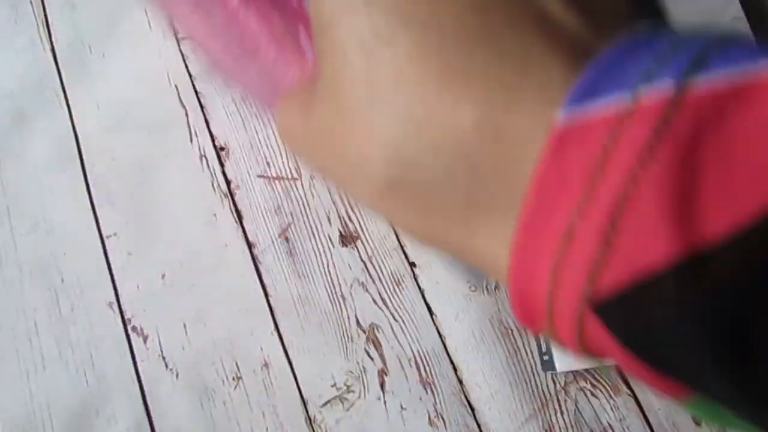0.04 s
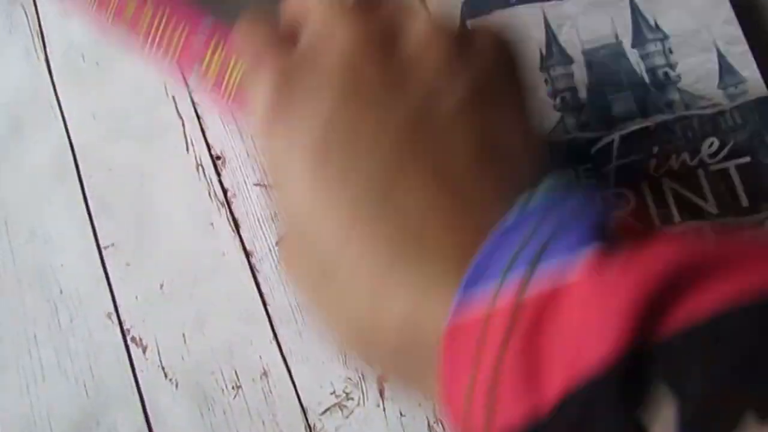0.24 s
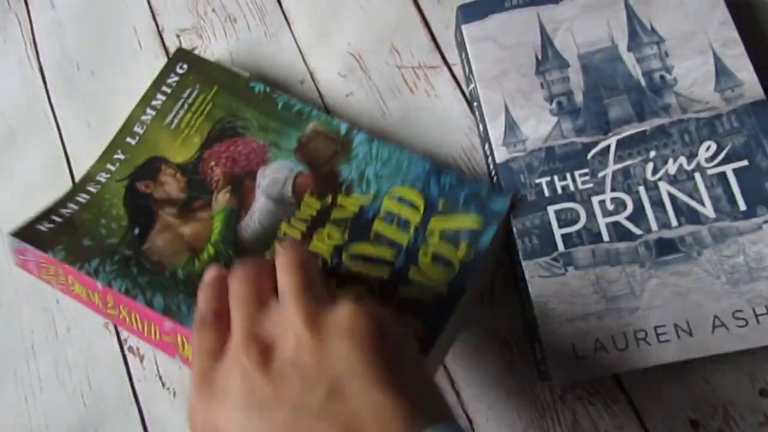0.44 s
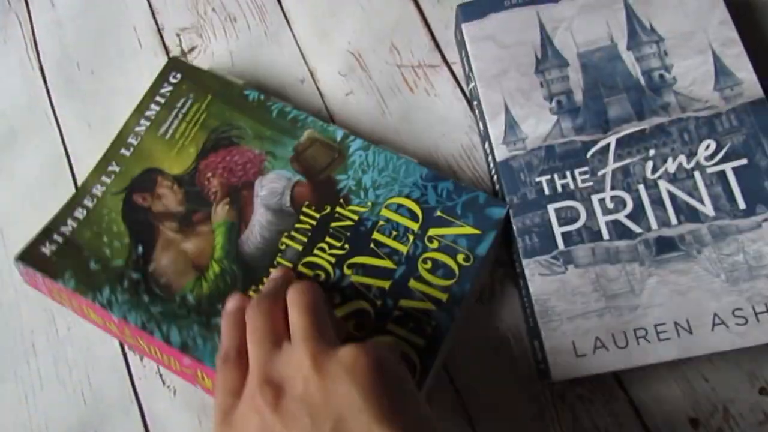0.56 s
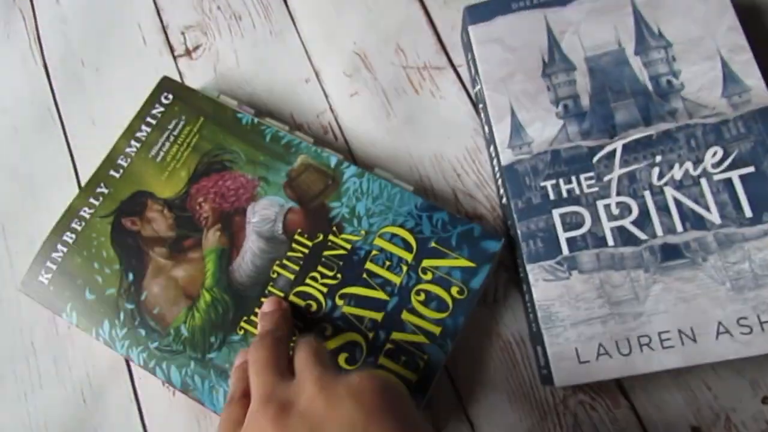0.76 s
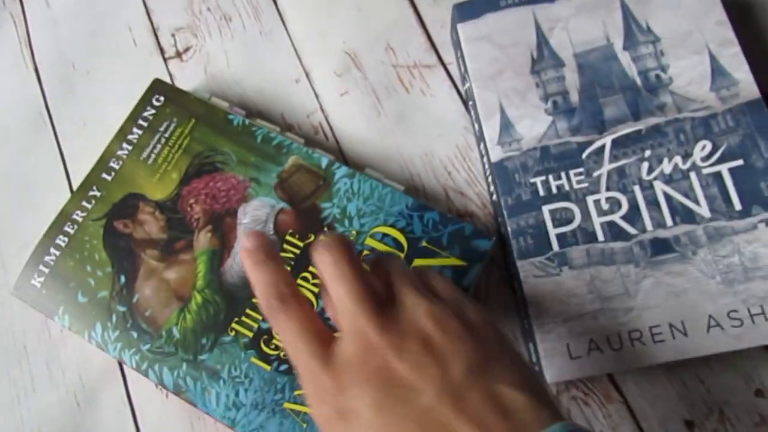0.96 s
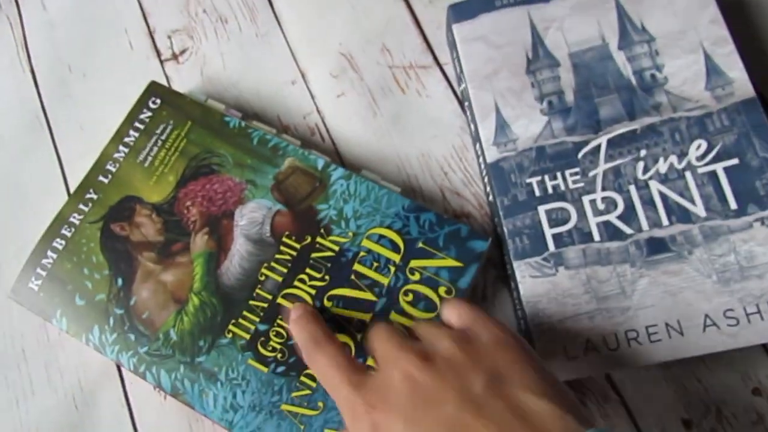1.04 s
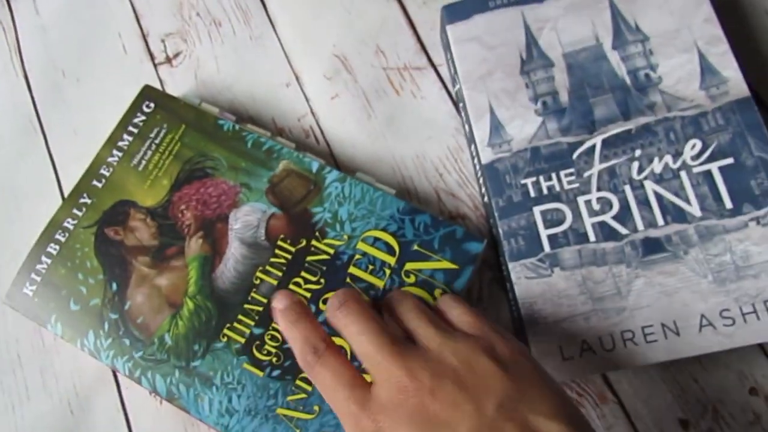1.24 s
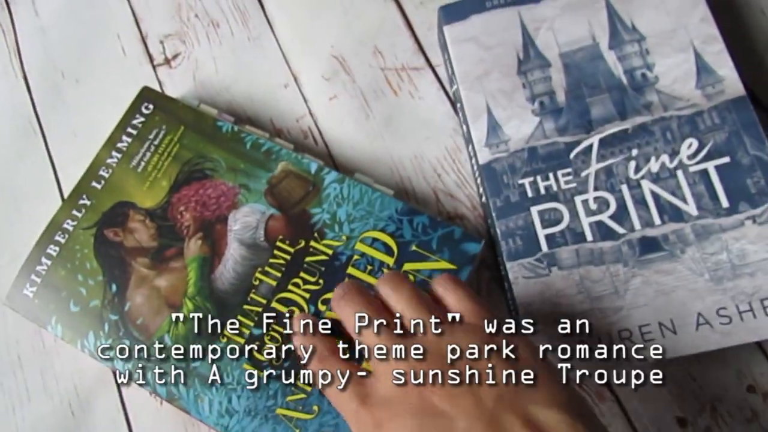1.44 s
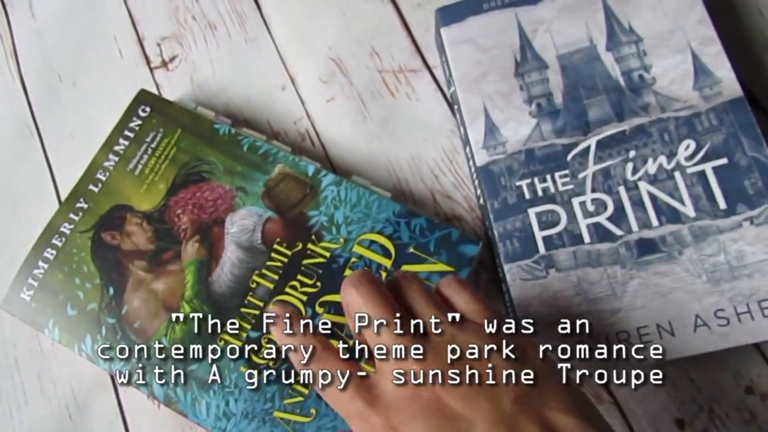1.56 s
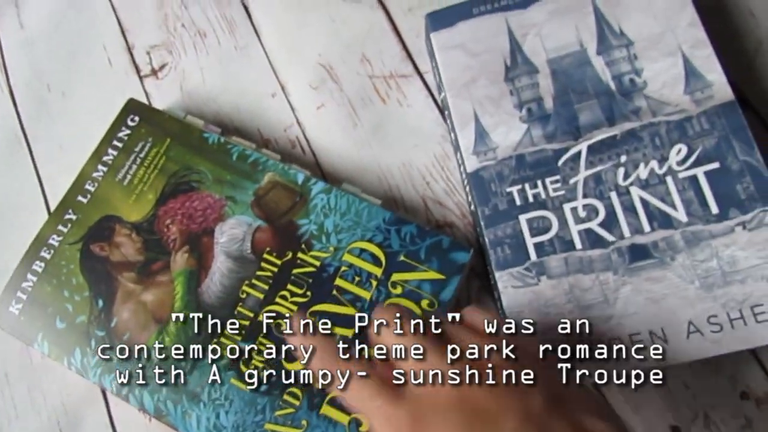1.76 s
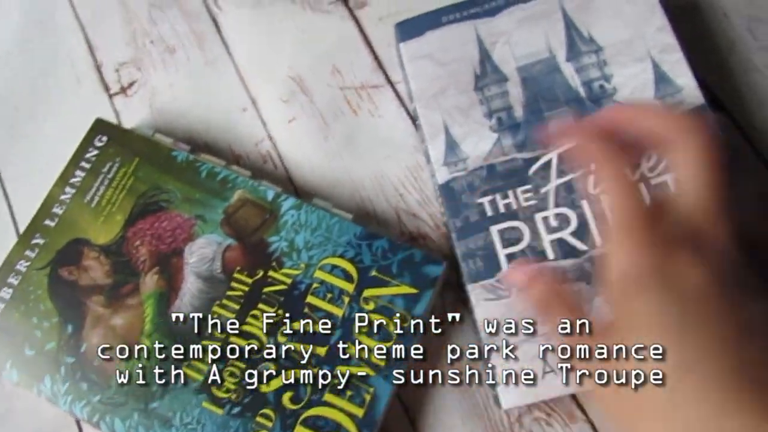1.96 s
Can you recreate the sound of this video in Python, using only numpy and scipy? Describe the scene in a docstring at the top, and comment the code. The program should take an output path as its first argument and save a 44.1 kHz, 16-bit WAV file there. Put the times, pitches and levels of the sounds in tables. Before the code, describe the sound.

A paperback is set down on wooden boards, close by in a small quiet room. Its cover drags and its spine thuds near 0.3 seconds, then the pages clap shut at 0.36 and it scuffs into place. From 0.7, fingers slide and squeak on the glossy cover, landing with one tick. Between 1.1 and 1.7 come four taps, nail ticks over dull knocks, with faint slides between and after.

```python
"""A paperback is set down on wooden boards in a small quiet room, close to the microphone.
Its spine thuds while the cover drags and the leaves brush; at 0.36 s the pages clap shut and the book
scuffs over the wood. From 0.67 s fingers slide and squeak on the glossy cover, landing once with a tick.
From 1.1 s they tap it four times, each tap a nail tick on a dull knock of book and boards,
with faint slides between and after."""
import sys
import numpy as np
from scipy import signal
from scipy.fft import rfft, irfft
from scipy.io import wavfile

SR = 44100
rng = np.random.default_rng(int(sys.argv[2]) if len(sys.argv) > 2 else 0)


def int16_out(signal):
    """Quantize to a 16-bit WAV file."""
    q = np.round(np.clip(np.atleast_2d(signal).T, -1, 1) * 32767)
    wavfile.write(sys.argv[1], SR, q.astype(np.int16))


N = 88200

# stereo side against mid, for rubs and rattles: freq_hz, side_db
RUB_WIDTH = [(100, -5.5), (1000, -14), (2500, -4), (6000, -7.5), (12000, -4)]


def undb(db):
    """Decibels to gain."""
    return 10 ** (np.asarray(db) / 20)


def freqs():
    """Bins in Hz of a spectrum twice the scene's length."""
    return np.maximum(np.arange(N + 1) * SR / (2 * N), 1)


def gains(points):
    """Gain per bin from (freq_hz, gain_db) points."""
    hz, db = np.array(points, float).T
    return undb(np.interp(np.log(freqs()), np.log(hz), db))


def shape(x, gain):
    """Minimum-phase filter with the given gain per bin."""
    cepstrum = irfft(np.log(gain))
    cepstrum[1:N] *= 2
    cepstrum[N + 1:] = 0
    return irfft(rfft(x, 2 * N) * np.exp(rfft(cepstrum)))[..., :N]


def since(start_s):
    """Seconds since the sample nearest start_s."""
    return (np.arange(N) - round(start_s * SR)) / SR


def widen(mid, other, side_curve):
    """Left and right from two unrelated signals."""
    side_gain = gains(side_curve)
    stereo = mid + np.array([[1], [-1]]) * shape(other, side_gain)
    return shape(stereo, 1 / np.sqrt(1 + side_gain ** 2))


def burst(start_s, fade_s):
    """Fading stereo noise of unit energy."""
    t = since(start_s)
    noise = rng.standard_normal((2, N)) * (t >= 0) * np.exp(-np.abs(t) / fade_s)
    return noise / np.sqrt(np.sum(noise ** 2, axis=1, keepdims=True))


def swell(peak_s, rise_s, fall_s):
    """Lopsided Gaussian envelope of a stroke."""
    t = since(peak_s)
    return np.exp(-.5 * (t / np.where(t < 0, rise_s, fall_s)) ** 2)


def friction(catches_per_s=5000, catch_db=-5):
    """Fine hiss with tiny uneven catches, fluttering with the pressure."""
    spread_db, flutter_db, flutter_s = 2.5, 1.5, .004
    catches = (rng.random((2, N)) < catches_per_s / SR) * rng.standard_normal((2, N))
    catches *= undb(spread_db * rng.standard_normal((2, N)))
    pressure = np.interp(since(0) / flutter_s, np.arange(N), rng.standard_normal(N))
    rub = rng.standard_normal((2, N)) + undb(catch_db) * catches / catches.std()
    rub *= undb(flutter_db * pressure)
    return widen(*(rub / rub.std()), RUB_WIDTH)


def wood_rub(level_curve, colour):
    """Friction of cover on wood, following a level curve."""
    time_s, level_db = np.array(level_curve).T
    envelope = undb(np.interp(since(0), time_s, level_db)) * (since(0) < time_s[-1])
    return shape(friction() * envelope, gains(colour))


def knock(modes, pan_db, start_s, level_db, contact_ms, lowest_hz, pitch_ratio):
    """A push rings the modes; longer contact is duller, and the spot sets how much bass is driven."""
    scatter_db, right_lag_s = 1, .00014
    t = np.arange(SR // 3) / SR
    ring = np.zeros((2, len(t)))
    for hz, mode_db, t60_s in modes:
        driven = 1 / np.hypot(1, (lowest_hz / hz) ** 4)
        size = undb(mode_db + scatter_db * rng.standard_normal((2, 1))) * driven
        ring += size * np.cos(2 * np.pi * hz * pitch_ratio * t) * np.exp(-np.log(1000) * t / t60_s)
    ring = signal.sosfilt(signal.butter(2, lowest_hz / 2, "high", fs=SR, output="sos"), ring)
    age = np.maximum([since(start_s), since(start_s + right_lag_s)], 0) / (contact_ms / 1000)
    push = age * np.exp(-np.minimum(age, 50))
    push /= push.sum(axis=1, keepdims=True)
    channel_db = level_db + np.array([[pan_db], [-pan_db]]) / 2
    return signal.fftconvolve(push, ring, axes=1)[:, :N] * undb(channel_db)


def strokes(table, rub):
    """Each stroke over the paper swells and fades in its own band."""
    # stroke spectrum: freq_hz, gain_db
    colour = [(100, 2), (700, 9), (850, 0), (1100, 5.5), (1900, 0.5), (2300, 3.5), (3100, 1.5), (4500, 0),
              (6500, -2), (8700, 0.5), (11000, 1.5), (16000, -10)]
    body_db = -16.5  # passed on by the book below the band
    out, f, paper = 0, freqs(), gains(colour)
    for peak_s, rise_s, fall_s, level_db, low_hz, high_hz in table:
        low_cut = 1 / np.hypot(1, (low_hz / f) ** 4)
        band = np.hypot(low_cut, undb(body_db)) / np.hypot(1, (f / high_hz) ** 2)
        stroke = np.roll(rub, rng.integers(N), axis=1) * swell(peak_s, rise_s, fall_s)
        out += shape(stroke, band * paper) * undb(level_db)
    return out


def crack(start_s, rattle_db, rattle_s=.0016):
    """A sharp pulse and a short rattle of paper, evened out in colour."""
    rattle = widen(*burst(start_s + 2 / SR, rattle_s), RUB_WIDTH)
    pulse = (since(start_s) == 0) + undb(rattle_db) * rattle
    power = np.abs(rfft(pulse.mean(axis=0), 2 * N)) ** 2
    notch_floor = .15
    return shape(pulse, 1 / np.sqrt(power / power.mean() + notch_floor))


def room_air():
    """Still air: steady, low, wide noise."""
    # air spectrum: freq_hz, gain_db
    colour = [(20, -52), (45, -44.5), (100, -38), (190, -40.5), (300, -46.5), (500, -49), (1000, -55),
              (2000, -62.5), (4000, -66.5), (8000, -71.5), (14000, -77), (16000, -90)]
    # side against mid: freq_hz, side_db
    width = [(30, -8), (100, 3.5), (400, 7), (2000, 1.5), (12000, -1.5)]
    return shape(widen(*rng.standard_normal((2, N)), width), gains(colour))


def cover_drag():
    """The cover drags while the book is lowered."""
    # drag envelope: time_s, level_db
    level_curve = [(0, -48), (.02, -56.5), (.12, -64), (.14, -58), (.154, -51.5), (.18, -51), (.218, -46),
                   (.255, -42), (.274, -40.5), (.285, -46), (.302, -51.5), (.322, -61), (.345, -50.5),
                   (.356, -54), (.39, -83)]
    # drag spectrum: freq_hz, gain_db
    colour = [(100, 1.5), (350, 9), (600, -2), (1400, 4.5), (2400, 5), (4000, 3), (7500, 1), (10500, -4),
              (13000, -4.5), (16000, -14)]
    return wood_rub(level_curve, colour)


def board_bumps():
    """The whole book bumps the boards and rings them."""
    # ring of the boards: base_hz, level_db, t60_s
    board_modes = [(50, -10, 0.094), (111, -2.5, 0.07), (170, -19, 0.047), (201, -2, 0.09),
                   (252.4, -9, 0.079), (373.5, -8, 0.057), (406.5, -13.5, 0.11), (496, -15.5, 0.069),
                   (616, -19, 0.091), (870, -24, 0.053)]
    # contacts: start_s, level_db, contact_ms, lowest_hz, pitch_ratio
    bumps = [(.0005, -29, 0.31, 344, 0.99), (.126, -35.5, 0.48, 376, 1.03), (.172, -35.5, 0.75, 220, 1.03),
             (.187, -30.5, 0.51, 230, 1.06), (0.222, -29.5, 0.48, 262, 1.06), (.236, -34, 0.46, 333, 0.88),
             (0.2638, -22, 0.6, 78, 0.96), (0.2723, -32, 1.1, 70, 1.1), (.3558, -21.5, .24, 201, .98),
             (.366, -33, .4, 260, 1.0), (0.3762, -29.5, 0.5, 180, 0.95), (0.49, -38, 0.4, 200, 1.0),
             (.5, -40, .6, 220, 0.99), (0.681, -41.5, 1.5, 30, 0.82), (.727, -38, .4, 360, .96)]
    pan_db = -2.5
    return sum(knock(board_modes, pan_db, *bump) for bump in bumps)


def leaf_brushes():
    """Leaves and cover brush each other briefly."""
    # brushes: peak_s, rise_s, fall_s, level_db, low_hz, high_hz
    brushes = [(.06, 0.088, 0.089, -52.5, 5440, 10300), (.156, 0.0059, 0.0055, -42.5, 4500, 6500),
               (.2728, 0.00046, 0.0013, -31.5, 1500, 12000), (.299, 0.0025, 0.0018, -45.5, 1500, 11000),
               (.339, 0.013, 0.0099, -44.5, 6000, 6600), (.3487, .0005, .0005, -44, 6000, 11000),
               (.4165, 0.0006, 0.00054, -28, 10500, 13500)]
    return strokes(brushes, friction())


def book_scuff():
    """The book scuffs into place on the wood."""
    # scuff envelope: time_s, level_db
    level_curve = [(.35, -82), (.36, -43), (.39, -44), (.436, -46), (.48, -49), (.502, -48.5), (.53, -45.5),
                   (.56, -53.5), (.61, -52), (.648, -54.5), (.7, -56), (.8, -63.5)]
    # scuff spectrum: freq_hz, gain_db
    colour = [(80, 1.5), (300, 10), (750, 3.5), (1000, 8), (1400, 7.5), (2200, 2), (4000, 2.5), (7000, -1),
              (11000, -4.5), (16000, -14.5)]
    return wood_rub(level_curve, colour)


def page_clap():
    """The pages shut: a swelling riffle that ends in a crack."""
    # riffle spectrum: freq_hz, gain_db
    riffle_colour = [(400, -1), (1500, -7), (3000, 1), (4000, 2), (4400, -5), (5100, 8.5), (5800, -4.5),
                     (6700, -5), (8300, 4.5), (11000, -5), (16000, -22)]
    # crack spectrum: freq_hz, gain_db
    clap_colour = [(200, -16), (500, 10), (760, 6), (1050, 11), (1450, 5), (2100, -4), (3300, -9),
                   (4000, -2), (5000, -1), (6000, -5), (8500, -9), (12000, -12.5), (16000, -30)]
    riffle_s, riffle_db, clap_db = .003, -22.5, -3.5
    closing = np.exp(-(2 * since(start_s=.3528) / riffle_s - 1) ** 4)
    riffle = shape(friction() * closing, gains(riffle_colour))
    clap = shape(crack(start_s=.3552, rattle_db=6), gains(clap_colour))
    return riffle * undb(riffle_db) - clap * undb(clap_db)


def finger_slides():
    """Skin slides grainily over the gloss, with a thin squeak where it sticks."""
    # slides: peak_s, rise_s, fall_s, level_db, low_hz, high_hz
    slides = [(.675, 0.01, 0.013, -38, 1810, 8000), (.685, 0.0032, 0.0057, -34, 2200, 11000),
              (.6928, 0.0037, 0.0012, -24, 7560, 12400), (.712, 0.0018, 0.01, -44, 400, 7000),
              (.734, 0.0067, 0.011, -37, 1300, 3860), (.752, 0.011, 0.0052, -35.5, 1740, 7300),
              (.763, 0.011, 0.0087, -45.5, 1510, 5000), (.823, 0.0091, 0.014, -39.5, 2100, 6400),
              (.8525, 0.013, 0.002, -36, 2170, 11500), (.859, 0.0056, 0.012, -46, 1940, 8950),
              (.89, 0.023, 0.031, -57.5, 1000, 2000), (1.154, 0.012, 0.0075, -52.5, 1530, 11500),
              (1.207, 0.027, .006, -63, 1520, 9400), (1.303, 0.0023, 0.0066, -42, 900, 5800),
              (1.317, .008, 0.016, -53.5, 500, 5000), (1.351, 0.0022, .002, -57, 1200, 10000),
              (1.398, 0.0076, 0.025, -62, 1210, 9150), (1.458, 0.011, 0.021, -45, 790, 3770),
              (1.488, 0.013, 0.017, -47, 486, 2800), (1.529, 0.007, 0.0056, -50.5, 700, 6500),
              (1.567, 0.0071, 0.006, -64, 900, 8000), (1.749, 0.0075, .01, -63.5, 1500, 9000),
              (1.884, 0.023, 0.023, -58, 900, 3140), (1.956, 0.012, 0.011, -62.5, 1500, 4000)]
    # squeaks: peak_s, rise_s, fall_s, level_db, centre_hz, width_hz
    squeaks = [(.692, 0.0044, 0.0015, -19.5, 8670, 1100), (.748, .012, 0.0063, -44, 8500, 1400),
               (1.472, .02, 0.021, -52, 8800, 2400)]
    rub = friction(catches_per_s=1300, catch_db=-2.5)
    out = strokes(slides, rub)
    for peak_s, rise_s, fall_s, level_db, centre_hz, width_hz in squeaks:
        resonance = 1 / (1 + (2 * (freqs() - centre_hz) / width_hz) ** 2)
        out += shape(rub * swell(peak_s, rise_s, fall_s), resonance) * undb(level_db)
    return out


def finger_taps():
    """The nail ticks and rings the cover as the fingertip knocks the book, which rebounds once."""
    # fingertip contacts: start_s, knock_db, contact_ms, lowest_hz, pitch_ratio, tick_db, spot_hz
    taps = [(0.7082, -31, 0.12, 300, 0.87, -17, 1230), (1.123, -42.5, 0.17, 35, 0.95, -19, 2370),
            (1.2997, -48.5, 0.057, 200, 1.0, -27.5, 3830), (1.3029, -45, 0.14, 100, 0.95, -25, 3800),
            (1.3044, -30, 0.2, 62, 0.98, -14, 3800), (1.5155, -39, 0.12, 40, 0.94, -17, 2000),
            (1.6876, -40, 0.15, 42, 0.98, -16.5, 2420)]
    # nail tick spectrum: freq_hz, gain_db
    nail_colour = [(300, -16), (900, -4.5), (1450, 1.5), (1700, -6.5), (2000, 2), (2500, 2.5), (3100, 0),
                   (3500, -3.5), (4600, -8.5), (5200, -3), (7500, -3), (9000, -1.5), (11000, -2.5),
                   (13000, -11.5), (16000, -16)]
    # hollow ring of the card cover: pitch_hz, level_re_tick_db, t60_s
    cover_modes = [(2000, -32, 0.015), (2450, -33, 0.011), (5060, -32.5, 0.0092), (8500, -29, 0.0064)]
    # dull ring of the book lying flat: base_hz, level_db, t60_s
    book_modes = [(47, -6.5, 0.086), (112, -5.5, 0.08), (152, -5.5, 0.056), (200.6, -.5, 0.069),
                  (261, -4, 0.075), (360, -17.5, 0.055), (486, -15, 0.063), (608, -10, .06),
                  (694, -10, 0.055), (959, -12.5, 0.08), (1300, -23, 0.066), (1440, -16, 0.081),
                  (1520, -22, 0.076)]
    pan_db, spot_db, spot_t60_s = -2, -23.5, .013
    rebound_s, rebound_db = .0078, -4
    ticks, rings = 0, 0
    for start_s, knock_db, contact_ms, lowest_hz, pitch_ratio, tick_db, spot_hz in taps:
        ticks += undb(tick_db) * crack(start_s, rattle_db=-2.5)
        cover = cover_modes + [(spot_hz, spot_db, spot_t60_s)]
        rings += knock(cover, 0, start_s - 1 / SR, tick_db,
                       contact_ms=.013, lowest_hz=lowest_hz, pitch_ratio=1)
        rings += knock(book_modes, pan_db, start_s, knock_db, contact_ms, lowest_hz, pitch_ratio)
        rings += knock(book_modes, pan_db, start_s + rebound_s, knock_db + rebound_db,
                       contact_ms=.55, lowest_hz=np.hypot(lowest_hz, 250), pitch_ratio=pitch_ratio * 1.06)
    return shape(ticks, gains(nail_colour)) + rings


def room(x):
    """Quick reflections from the boards and a faint short tail from the walls."""
    early_db, tail_db, t60_s = -20.5, -12.5, .2
    early = undb(early_db) * burst(start_s=.0025, fade_s=.0059)
    tail = undb(tail_db) * burst(start_s=.005, fade_s=t60_s / np.log(1000))
    return x + signal.fftconvolve(x, early + tail, axes=1)[:, :N]


def scene():
    """Book and fingers in the room, over its still air."""
    air = room_air()
    book = cover_drag() + board_bumps() + leaf_brushes() + book_scuff() + page_clap()
    return air + room(book + finger_slides() + finger_taps())


def record(dry):
    """The microphone cuts the top."""
    top_hz = 16000
    return signal.sosfilt(signal.ellip(8, .2, 70, top_hz, fs=SR, output="sos"), dry)


dry = scene()
out = record(dry)
int16_out(out)
```